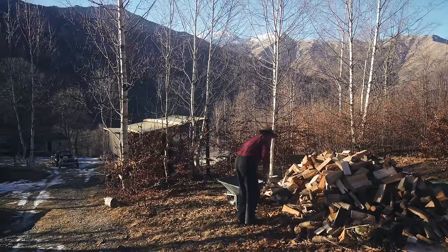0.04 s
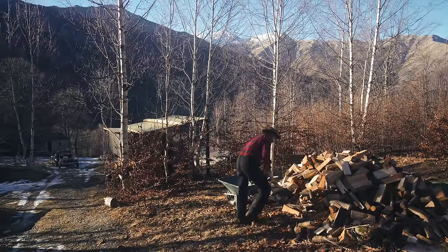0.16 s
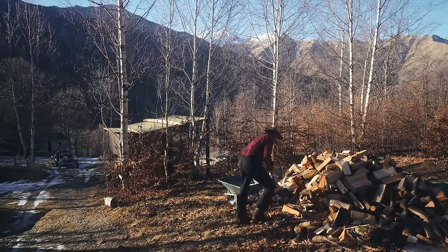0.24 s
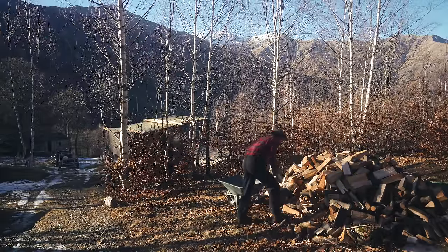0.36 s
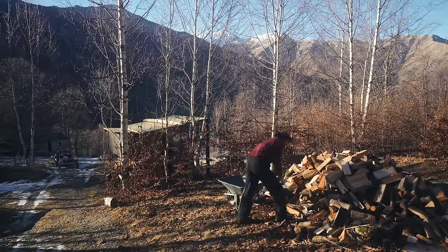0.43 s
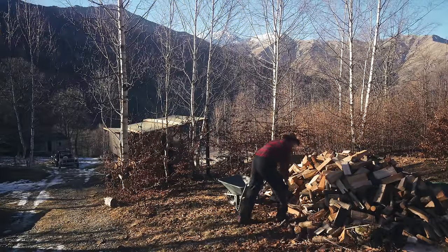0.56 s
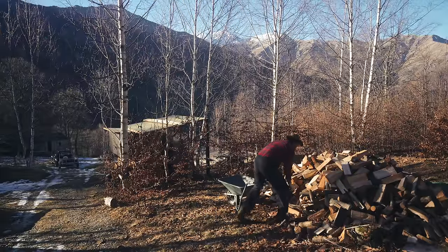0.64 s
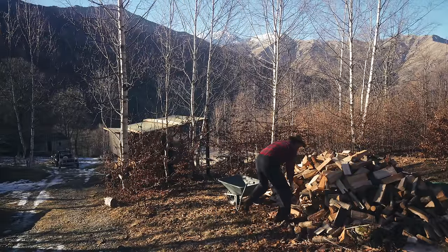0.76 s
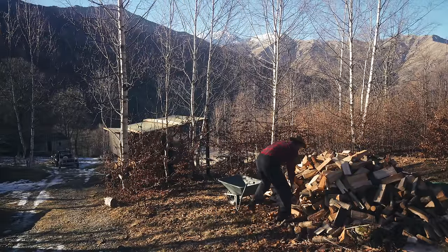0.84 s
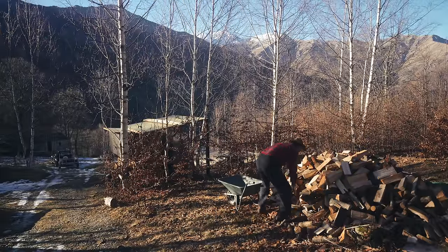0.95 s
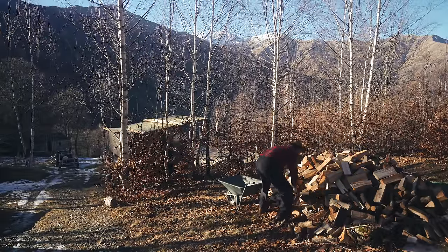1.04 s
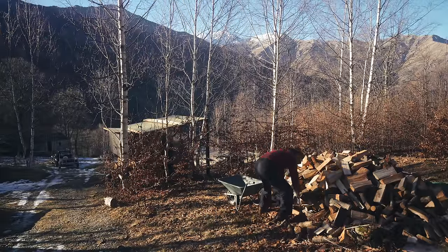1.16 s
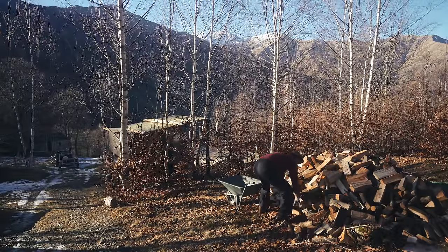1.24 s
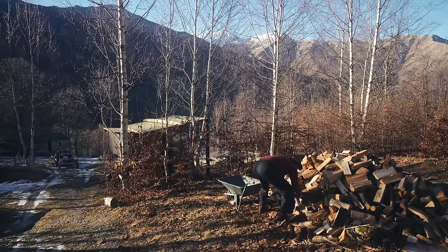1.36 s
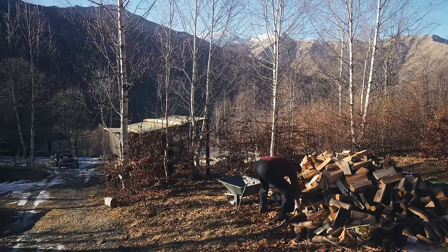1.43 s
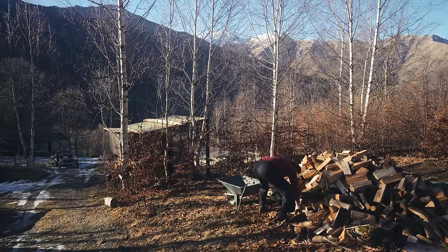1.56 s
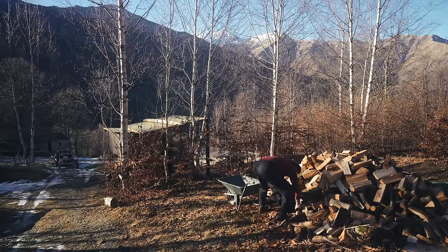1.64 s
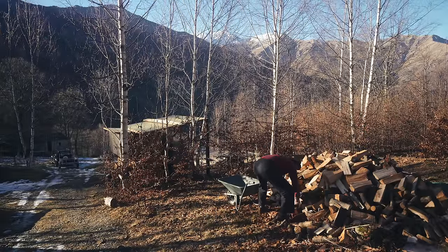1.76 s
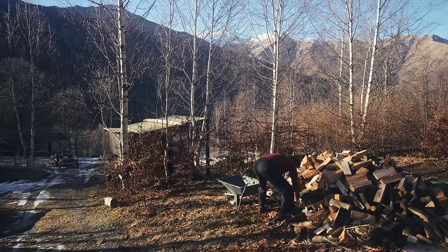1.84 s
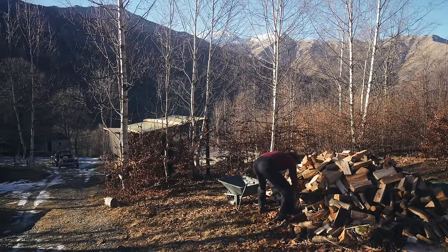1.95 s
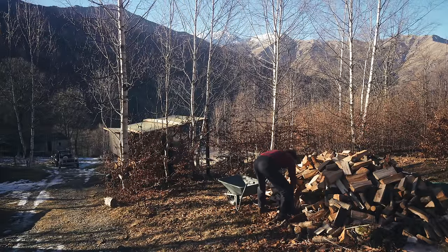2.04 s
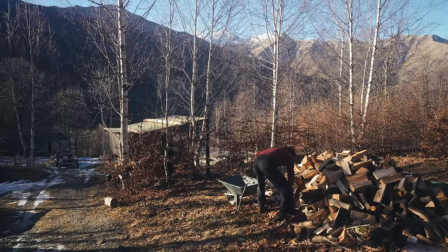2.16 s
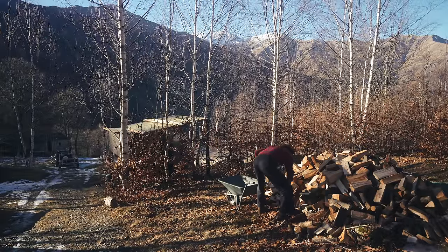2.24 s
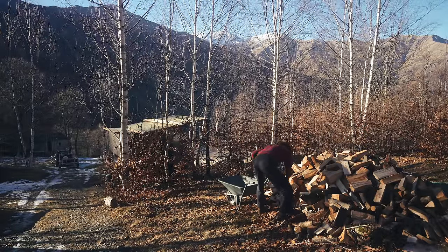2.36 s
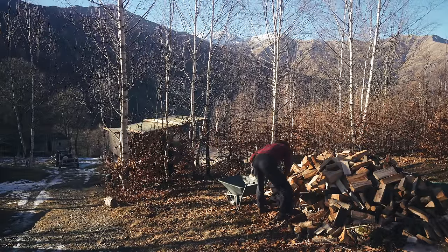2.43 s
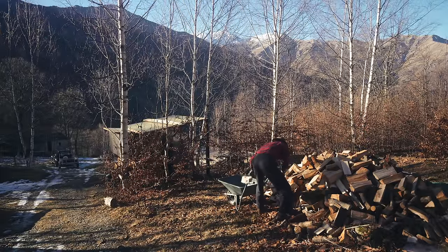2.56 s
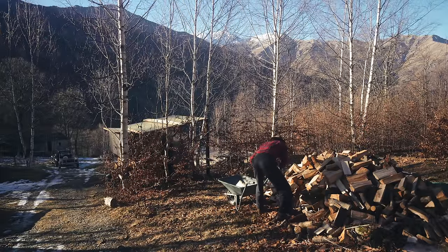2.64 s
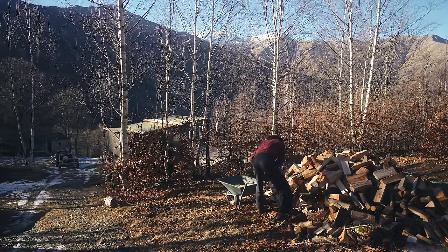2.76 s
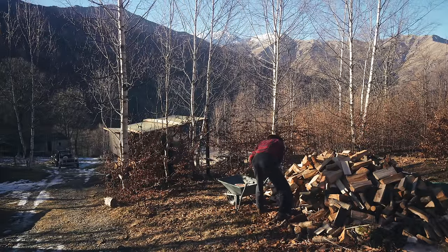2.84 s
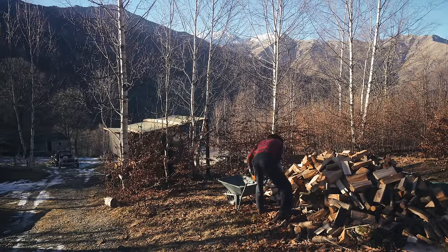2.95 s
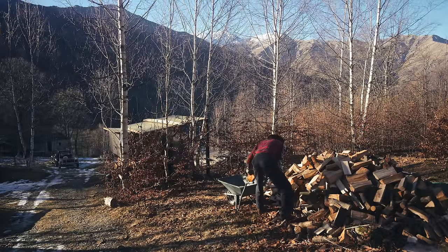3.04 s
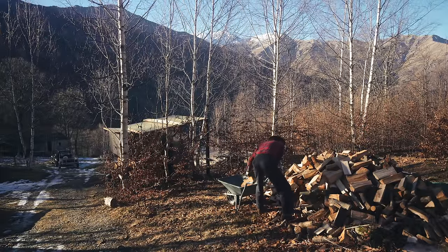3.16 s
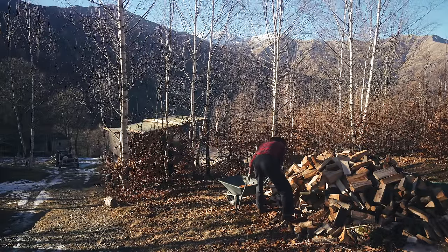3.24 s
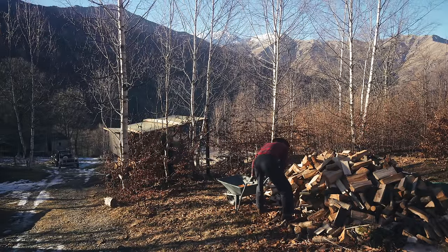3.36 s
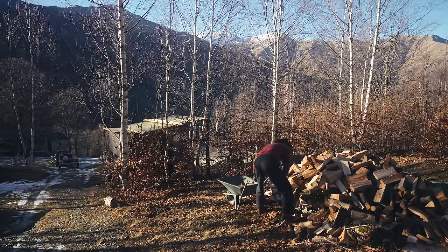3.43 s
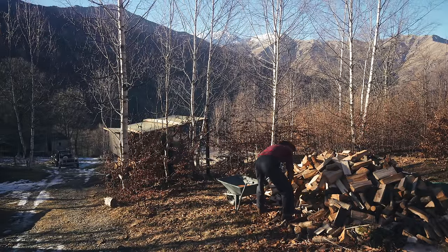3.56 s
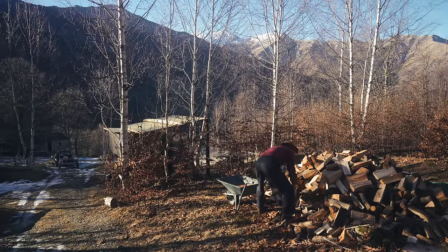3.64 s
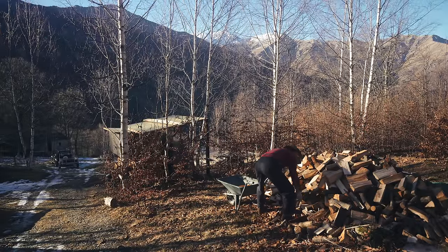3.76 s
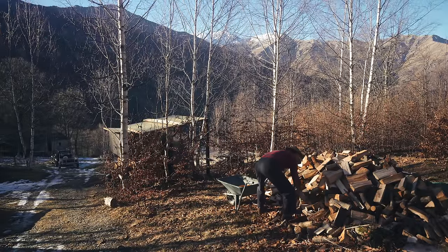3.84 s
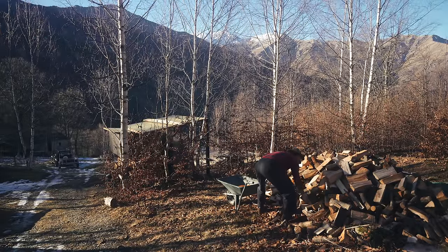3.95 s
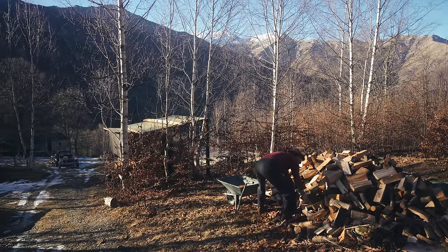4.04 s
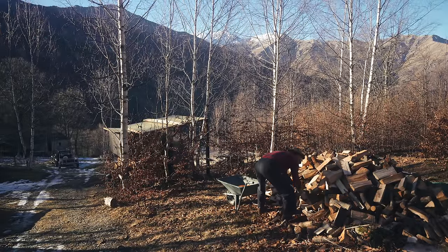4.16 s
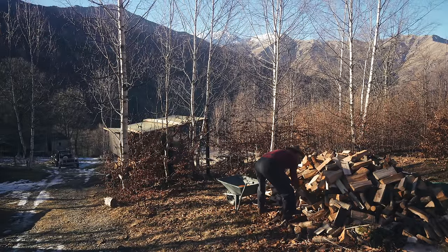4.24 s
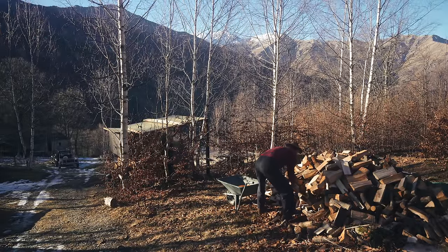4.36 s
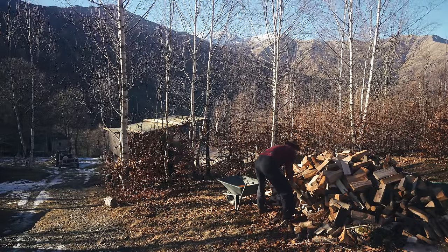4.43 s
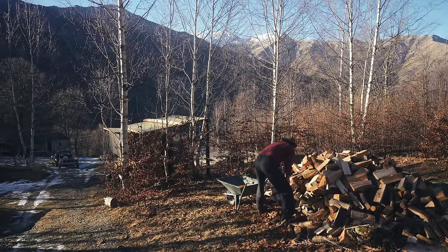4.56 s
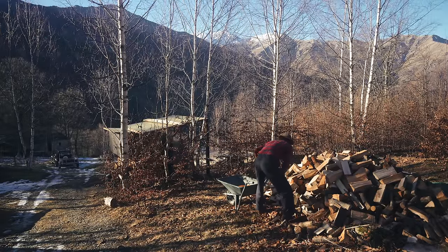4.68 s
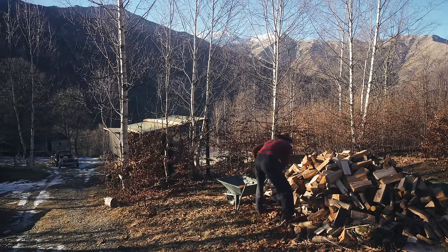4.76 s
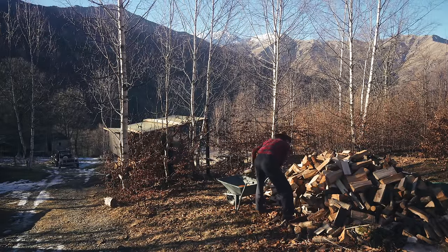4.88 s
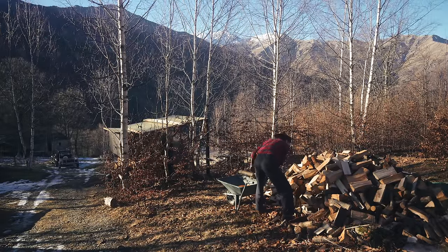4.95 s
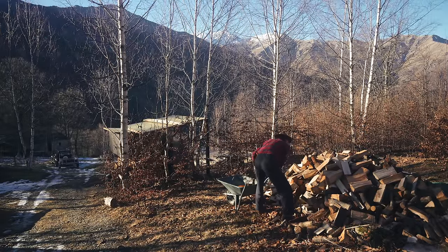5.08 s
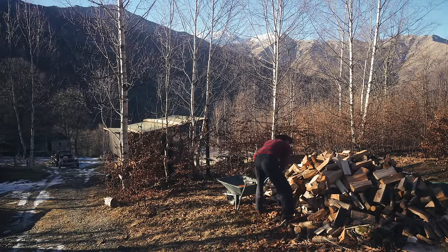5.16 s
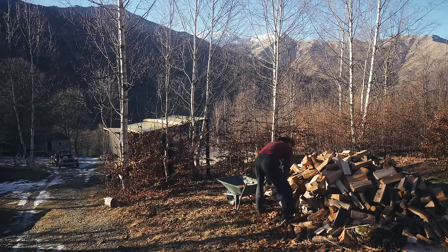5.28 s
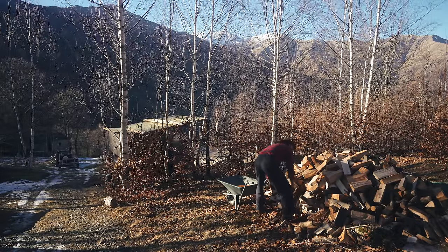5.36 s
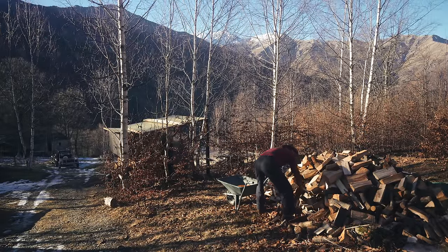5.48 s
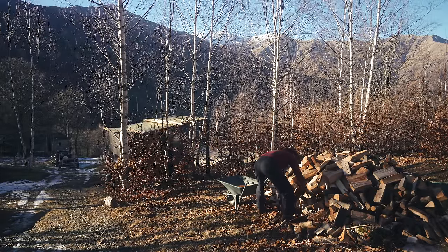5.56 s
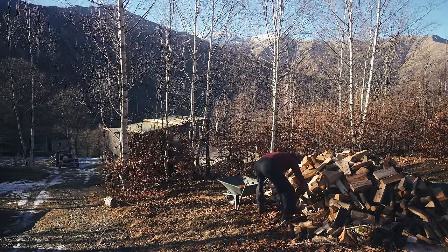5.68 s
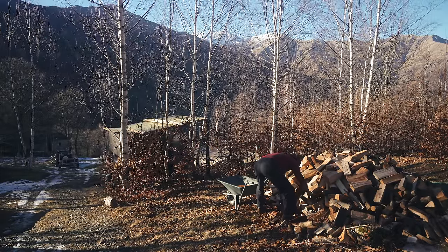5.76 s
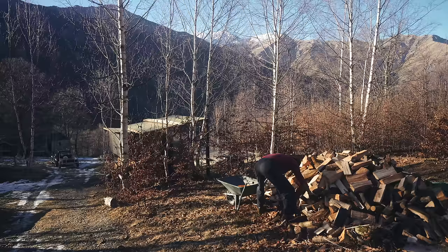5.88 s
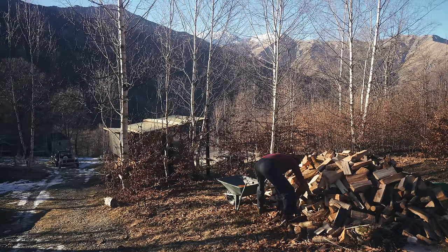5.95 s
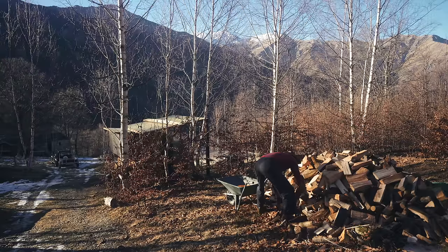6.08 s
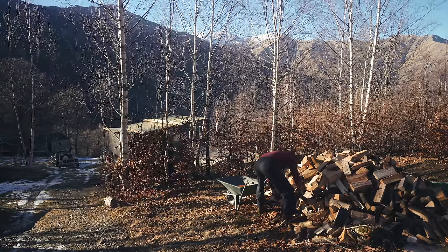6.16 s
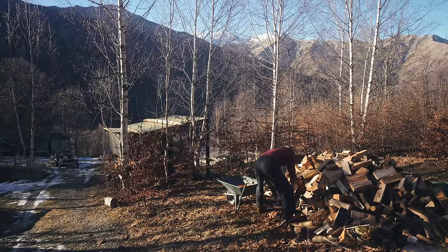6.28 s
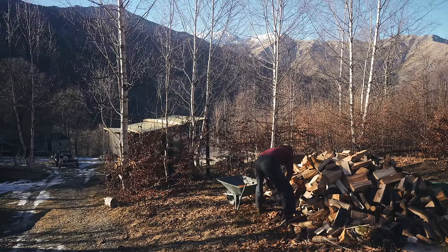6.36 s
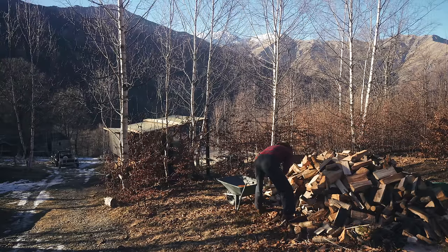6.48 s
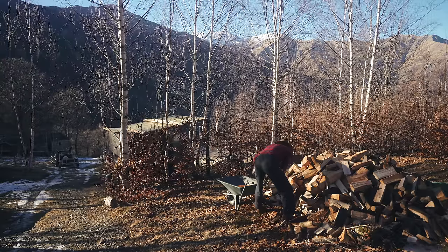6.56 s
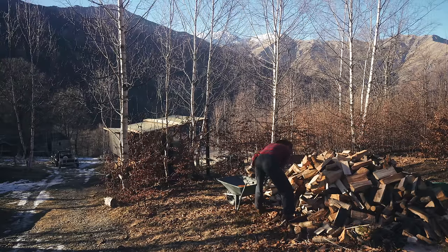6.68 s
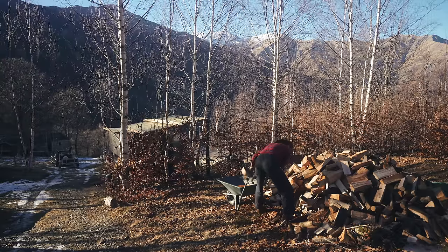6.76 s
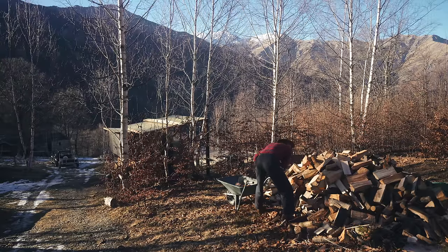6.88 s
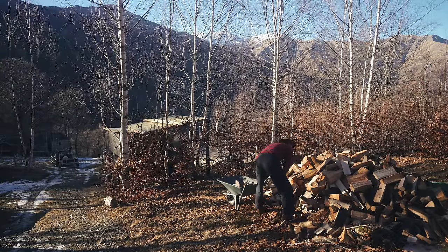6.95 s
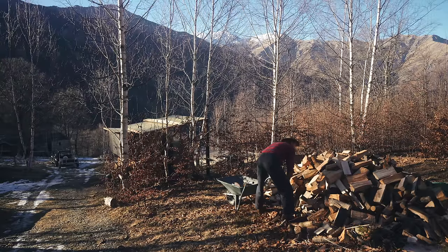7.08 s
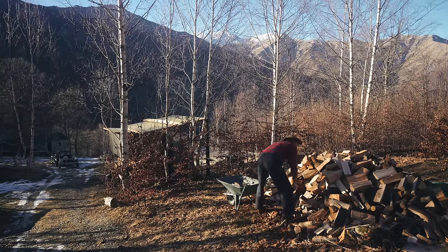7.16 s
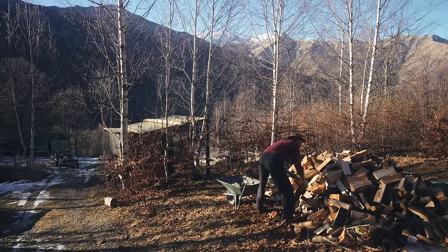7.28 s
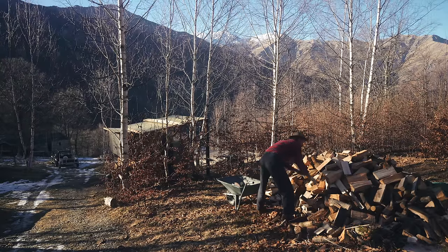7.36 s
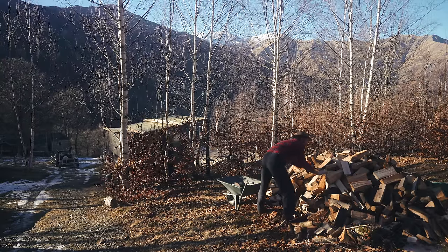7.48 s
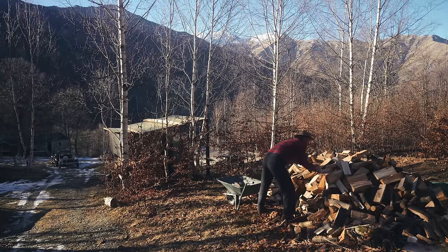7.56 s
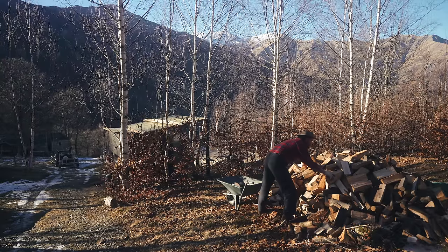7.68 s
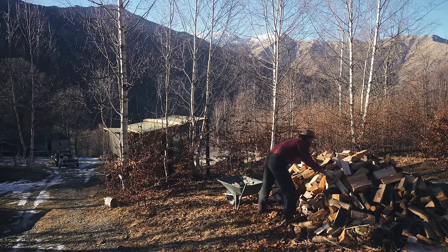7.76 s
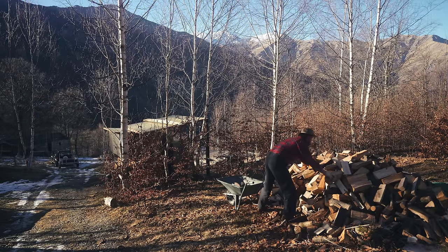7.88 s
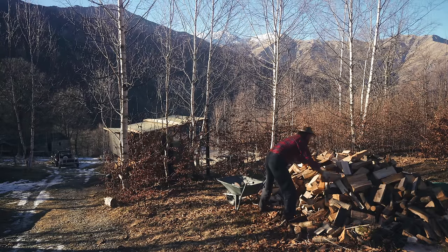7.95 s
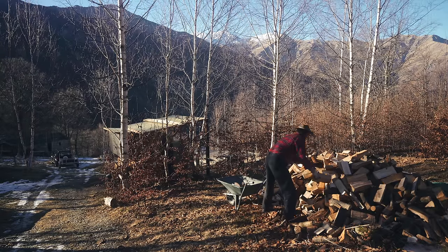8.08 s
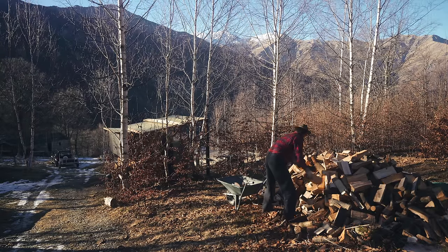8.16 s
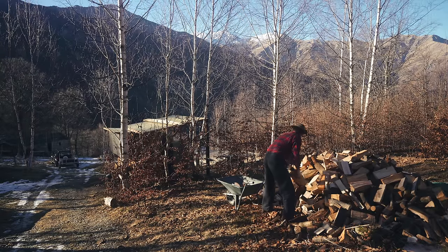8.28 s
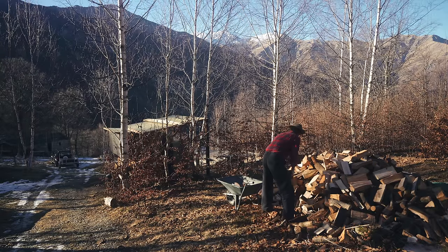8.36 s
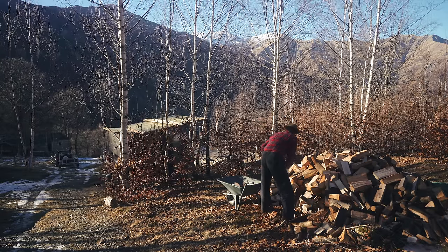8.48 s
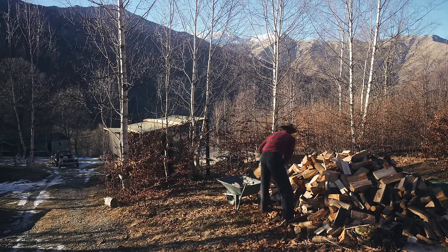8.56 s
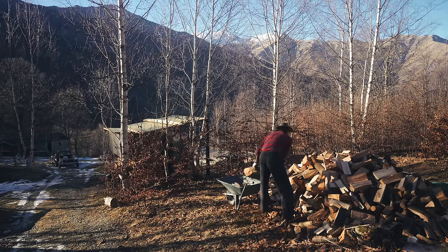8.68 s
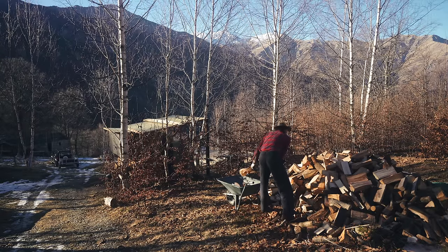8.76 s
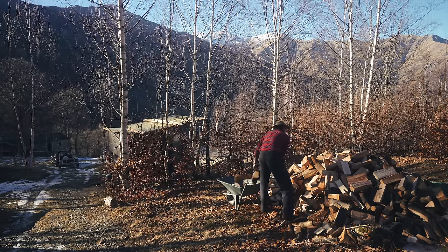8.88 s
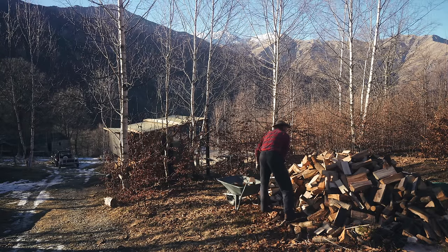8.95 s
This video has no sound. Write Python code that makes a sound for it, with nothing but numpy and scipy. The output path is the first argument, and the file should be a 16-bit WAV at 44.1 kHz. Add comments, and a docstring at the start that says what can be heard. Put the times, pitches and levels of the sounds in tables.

```python
"""Split logs clack, crack and boom into a steel wheelbarrow on a leafy slope, some metres away.
Each knock is two brief wood modes plus a crack of filtered noise; its shake sets the tray boom and clatter.
Noise grains make the rustle of leaves and tumbling wood; wavering tones squeak, noise bursts tick sharply.
Decaying sines make one dry log ring; coloured noise is the faint hum of the valley.
The ground and the trees send the wood sounds back."""
import sys
import numpy as np
from scipy import signal
from scipy.fft import rfft, irfft
from scipy.io import wavfile
from scipy.ndimage import uniform_filter1d

SR = 44100
rng = np.random.default_rng(int(sys.argv[2]) if len(sys.argv) > 2 else 0)


def inscribe(sig):
    """Save sig as 16-bit PCM at rate SR to the path in sys.argv[1].

    A 1-D sig is mono; a 2-D sig holds one channel per row.
    Samples are clipped to [-1, 1] before scaling.
    """
    pcm = np.round(np.clip(np.atleast_2d(sig).T, -1, 1) * 32767)
    wavfile.write(sys.argv[1], SR, pcm.astype(np.int16))


N = 397341

# Far hum and air. Each row: frequency in Hz, relative spectrum in dB.
VALLEY_SPECTRUM = [(18, -49), (30, 18.5), (141, -9), (273, 0), (1220, -4), (2170, -16), (3980, -22),
                   (14800, -40.5), (16000, -31.5)]
# Colour of leaf rustle. Each row: frequency in Hz, relative spectrum in dB.
LEAF_SPECTRUM = [(59, -19), (100, -22.5), (302, -5), (343, -4.5), (481, 0), (3250, -0.5), (7940, -10),
                 (10000, -23.5), (13500, -20.5), (16000, -35)]
# Colour of loose wood. Each row: frequency in Hz, relative spectrum in dB.
PILE_SPECTRUM = [(24, -53), (60, -7.5), (163, -3), (330, -7.5), (570, -6), (1070, -11.5), (2000, -16),
                 (3500, -19), (5600, -43), (16000, -63.5)]
# Boots and hands stir leaves, bark and loose wood. Each row: peak time in seconds, leaf level in dB,
# wood level in dB, rise in seconds per 20 dB, fall in seconds per 20 dB.
STIRS = [(0.029, -57.5, -40, 0.52, 0.1), (.195, -36, -43.5, 0.079, 0.075), (0.441, -22.5, -45, 0.014, 0.07),
         (0.577, -32, -55, 0.14, 0.087), (0.718, -46, -54, 0.39, 0.26), (1.115, -36, -43.5, 0.11, 0.092),
         (1.451, -49.5, -74, 0.16, 1), (1.734, -46, -54, 0.54, 0.17), (2.1, -51.5, -74, 1, 0.49),
         (2.588, -53.5, -62, 0.19, 0.11), (3.149, -35.5, -44, 0.19, 0.08), (3.462, -53, -46, 0.024, .06),
         (3.787, -60, -48, 0.47, .3), (3.931, -64, -51.5, 0.24, 0.36), (4.143, -51, -57, 0.077, 0.17),
         (4.35, -47.5, -48.5, 0.59, 0.2), (4.51, -55, -62, .03, 0.21), (4.737, -49, -59, 0.15, 0.12),
         (4.955, -57, -72, 0.34, 0.24), (5.047, -59.5, -63, .03, .1), (5.653, -48, -62, 0.7, 0.18),
         (5.879, -52, -54.5, 0.31, 0.43), (6.128, -45, -69, 0.38, 0.18), (6.683, -59, -71, 0.11, 0.26),
         (6.918, -38.5, -51.5, 0.0096, 0.072), (7.709, -57, -59.5, 0.022, 0.37),
         (7.95, -43, -48, 0.015, 0.068), (8.03, -48.5, -55.5, 0.37, 0.27),
         (8.63, -57.5, -64.5, 0.092, 0.11), (8.79, -46, -52.5, 0.065, 0.26), (8.929, -41, -71, 0.072, .5)]
# Log blows. Each row: time in seconds, low mode level in dB, low mode in Hz, high mode level in dB,
# high mode in Hz, crack level in dB before GRIT_DB, shake of the load in dB.
KNOCKS = [(0.0972, -24.5, 316, -31, 1520.0, -64, -40), (0.4267, -22.5, 1020, -25, 1360, -17, -37),
          (0.4352, -22, 447, -15.5, 2500.0, -23, -26.5), (0.4499, -26, 473, -9.5, 3670.0, -16, -40),
          (0.4635, -25, 1000, -17, 2600, -24, -44), (0.484, -18, 1500, -22, 2500, -24, -46),
          (0.511, -21, 1000, -40, 2000, -45, -50), (0.5265, -24, 332, -16, 3660.0, -13, -34),
          (0.531, -22.5, 600, -20, 2300, -30, -50), (0.622, -18.5, 1900, -14.5, 3990.0, -14.5, -54),
          (1.017, -38, 356, -43.5, 1500, -32, -36), (1.0398, -36.5, 510.0, -44, 1570.0, -29, -38),
          (1.066, -29, 557, -23.5, 2360.0, -23.5, -31.5), (1.0873, -42.5, 795, -21.5, 4470.0, -12.5, -59),
          (1.1058, -39.5, 900.0, -9.5, 3800.0, -15.5, -50.5),
          (1.1205, -47, 900.0, -18.5, 3560, -7.5, -51.5), (2.287, -58, 960, -43, 1750.0, -28.5, -65.0),
          (2.627, -34, 745, -29, 2200.0, -36.5, -59.5), (2.7429, -11.5, 365, -5, 1200, -11.5, -7),
          (2.7495, -20, 480, -14, 950, -34, -11), (2.7575, -11, 700, -11.5, 1370, -30, -15.5),
          (2.7745, -9.5, 500, -10.5, 1300, -17, -7), (2.7778, -11, 200, -9.5, 1700, -13, -10.5),
          (2.7855, -11.5, 300, -9.5, 1200, -24, -13), (2.81, -12, 197, -19.5, 1360.0, -17, -21),
          (2.8436, -27, 565, -28, 1200.0, -36, -17), (2.8737, -28, 526, -30, 1250.0, -41, -26),
          (2.98, -20.5, 333, -19, 1240.0, -51, -29), (2.9949, -5.5, 452, -11.5, 1100.0, -46.5, -11.5),
          (3.0125, -12.5, 490, -15.5, 1820, -16.5, -13.5), (3.034, -24.5, 557, -23, 1800, -34, -19.5),
          (3.1372, -50, 596, -24, 4420.0, -9, -28.5), (3.199, -28, 810, -24, 1510, -19.5, -36),
          (3.244, -42, 900, -27.5, 1590, -45, -35), (3.257, -26, 470, -22, 1170.0, -37.5, -21),
          (3.2767, -7, 340, -13, 1100.0, -41, -8), (3.3003, -9, 500, -24, 1100, -27, -11.5),
          (3.3117, -11.5, 530, -21, 1230.0, -28.5, -23), (3.3222, -7, 1600, -8.5, 2950, -13, -11),
          (3.3255, -8.5, 630, -7.5, 2900, -4.5, -10), (3.3355, -11.5, 260, -18, 1500, -20, -20),
          (3.3469, -14, 420, -9.5, 1100.0, -24, -28.5), (3.3653, -13, 590, -18, 1180.0, -31.5, -13),
          (3.4114, -15.5, 460.0, -22, 1140.0, -45.5, -39), (3.4253, -17, 550, -19, 1610.0, -42, -22.5),
          (3.4548, -11, 1900, -10, 3250, -14.5, -26.5), (3.554, -27.5, 520, -44, 1520.0, -55.0, -53),
          (3.6108, -27.5, 530, -28, 1100.0, -58, -40.5), (4.0381, -43, 604, -33, 2720.0, -23, -39.5),
          (4.1378, -18.5, 1230, -14.5, 2240, -32, -38.5), (4.226, -43, 900.0, -32.5, 2000.0, -25, -36.5),
          (4.3197, -36, 374, -32, 1260.0, -33, -38), (4.4718, -26, 515, -30, 1110.0, -59.5, -35),
          (4.5028, -29, 835, -13.5, 2360.0, -8, -51), (4.546, -32.5, 505, -42, 1090, -55, -39),
          (4.5662, -25.5, 307, -37, 1570.0, -57, -43), (4.5868, -26.5, 553, -33.5, 1370.0, -28, -39),
          (4.6363, -39, 580.0, -34.5, 1580, -55, -35.5), (4.7325, -7, 472, -23.5, 1100.0, -31.5, -28),
          (5.0393, -18, 876, -15, 1350.0, -56, -37), (5.1332, -16.5, 400.0, -20, 1690.0, -40, -16),
          (5.1929, -15.5, 510, -23.5, 2140.0, -46.5, -18), (5.2262, -5.5, 302, -6.5, 1100.0, -25, -8.5),
          (5.2382, -2, 490, -6, 1100.0, -25.5, -15), (5.2525, -9.5, 554, -31, 1110.0, -30, -17.5),
          (5.2637, -6, 910, -10, 2300, -15.5, -20), (5.2668, -1.5, 1010, -14, 2000, -25, -14.5),
          (5.2865, -11, 795, -20, 1470.0, -41, -36), (5.3113, -21, 411, -29.5, 1550, -39, -23.5),
          (5.3404, -14.5, 350, -18, 1180.0, -55.5, -22), (5.3807, -36, 520, -27.5, 1200, -43.5, -21.5),
          (5.4335, -3, 502, -13.5, 1350.0, -27.5, -12), (5.4391, -3, 430, -5.5, 1360.0, -13.5, -16.5),
          (5.4751, -15.5, 510, -34, 1100.0, -30, -48.5), (5.574, -29, 480, -46, 2400, -50, -27),
          (5.5805, -12, 540, -24, 1000, -48, -27.5), (5.681, -32.5, 575, -40, 2890.0, -44, -47),
          (6.911, -36, 1080, -28.5, 2420.0, -12, -40.5), (6.9367, -6, 560, -16, 1100.0, -29, -16),
          (6.9586, -9.5, 685, -15, 1380.0, -37, -20), (6.9672, -26.5, 760.0, -15.5, 1360.0, -35.5, -15),
          (7.0044, -17.5, 590, -16, 1440.0, -33, -18.5), (7.013, -29, 690, -16.5, 2950.0, -41, -38),
          (7.0484, -3, 635, -5, 1100.0, -41, -23.5), (7.0653, -16, 490, -16.5, 1400.0, -53, -45),
          (7.0897, -19.5, 670.0, -16.5, 1510.0, -50, -27.5), (7.1186, -21, 260.0, -31, 1490.0, -48.5, -32),
          (7.1376, -12.5, 360, -18.5, 1100.0, -49.5, -28), (7.17, -27, 520, -28.5, 1490, -49, -32.5),
          (7.2079, -4.5, 773, -27, 1440.0, -51, -35), (7.249, -21.5, 700, -32, 1200, -60, -46),
          (7.557, -52.5, 350.0, -35.5, 1673, -35, -49), (7.8378, -41.5, 333, -47, 1100.0, -56, -44),
          (7.878, -39, 905, -39.5, 1490, -50, -51), (7.9407, -35, 636, -34.5, 1980.0, -48, -46.5),
          (8.0361, -24.5, 456, -28.5, 1380.0, -24, -39), (8.152, -56, 590, -42, 3130, -29, -59.5),
          (8.333, -31, 510, -60, 1310.0, -61, -50), (8.357, -39, 550, -60, 1300, -60, -47.5),
          (8.7881, -17.5, 1650, -12, 3630.0, -20, -63), (8.8225, -32, 610, -23.5, 1800, -30, -55),
          (9.0046, -2, 666, -4, 1100.0, -19, -33.0)]
# Modes of the steel tray. Each row: frequency in Hz, relative level in dB, decay by 60 dB in seconds.
TRAY_MODES = [(157, -4, 0.14), (213, -3.5, 0.18), (118, -8, 0.18), (494, -9, 0.33), (660, -3, 0.13)]
# Reflections off the ground. Each row: delay in seconds, gain in dB.
GROUND_ECHOES = [(.0045, -22)]
# Wood sliding on wood. Each row: start in seconds, length in seconds, mean frequency in Hz, level in dB.
SQUEAKS = [(1.108, 0.0076, 3215, -14), (1.372, 0.08, 1413, -52), (4.245, 0.022, 4200, -50),
           (4.331, 0.085, 1700, -40), (4.423, 0.031, 2500, -49), (5.737, 0.076, 1567, -51),
           (5.858, 0.036, 1557, -47), (5.955, .1, 1590, -52), (8.739, 0.036, 1360, -47.5)]
# Small sharp ticks: snapping twigs and light knocks of wood. Each row: time in seconds, peak level in dB,
# centre frequency in Hz.
SHARP_TICKS = [(2.7229, -32.5, 2250), (3.969, -41, 3500), (3.991, -41, 4000), (4.105, -37.5, 3000),
               (4.776, -42, 4200), (4.785, -36, 3000), (4.817, -37, 2500), (4.874, -49, 5500),
               (5.065, -40, 3800), (5.149, -33.5, 3500), (5.315, -39.5, 8000), (5.795, -34.5, 2500),
               (5.868, -43, 2500), (5.942, -43, 2500), (6.018, -35, 3000), (6.095, -44, 3000),
               (6.225, -39.5, 3000), (8.9172, -28, 2700)]
# Modes of a dry log. Each row: frequency in Hz, relative level in dB, decay by 60 dB in seconds.
SINGER_MODES = [(1534, 0, 0.2), (1527, -19, 0.95), (1445, 9, 0.03), (1682, -22, 0.35)]
# Blows on that log. Each row: time in seconds, gain in dB.
SINGER_BLOWS = [(7.053, -33), (7.089, -33), (7.2073, -17), (7.2391, -23)]

VALLEY_DB = -58
CALM_LEAVES_DB, CALM_WOOD_DB = -68, -62  # floors: leaves and wood are never quite still
# a shaken load sheds bark and rolls on: level against the shake
SHED_DB, SHED_T60_S, SHED_RISE_S = -26.5, 0.31, 0.0021
ROLL_DB, ROLL_T60_S, ROLL_RISE_S = -20, 0.7, 0.05
LOW_PEAK_CYCLES, HIGH_PEAK_CYCLES = 0.96, 1.31  # cycles until a mode is at its strongest
RING_DB, RING_RISE_CYCLES, RING_T60_CYCLES = -16, 8.3, 8.7  # soft ring-on of each mode, before its rise
CRACK_PEAK_S, GRIT_DB = 0.00079, -7.5
KNOCK_LEAD_S = 0.0009
PILE_DB, PILE_T60_S, PILE_RISE_S = -5.5, 0.047, 0.00087
TRAY_DB, TRAY_RISE_S = -10, 0.0022  # boom against the shake
CLATTER_DB = -5.5  # against the shake
CLATTER_T60_S, CLATTER_RISE_S = 0.23, 0.00039
CLATTER_TREBLE_T60_S, CLATTER_TREBLE_RISE_S = 0.091, 0.0005
CLACKS_PER_S_AT_500_HZ, CLACK_T60_CYCLES = 70, 12
TREES_DB, TREES_T60_S, TREES_RISE_S = -19.5, 0.27, 0.017
TICK_PEAK_S, TICK_BAND_RATIO = 0.00069, 1.3
TOP_HZ, BASS_CUT_HZ, CEILING = 16000, 70, 0.85


def undb(db):
    """Amplitude ratio of a level in dB."""
    return 10 ** (np.asarray(db) / 20)


def level(x, rms_db):
    """Scale x to the given RMS level."""
    return x * undb(rms_db) / np.sqrt(np.mean(x ** 2))


def add(out, start_s, x):
    """Mix x into out from start_s."""
    i = int(start_s * SR)
    out[i:i + len(x)] += x[:len(out) - i]


def fade(t, t60):
    """Exponential decay, 60 dB down at t60; t and t60 share a unit."""
    return np.exp(-np.log(1000) * t / t60)


def onset(t_s, rise_s):
    """Exponential approach from 0 to 1."""
    return 1 - np.exp(-t_s / rise_s)


def swell(t_s, peak_s):
    """Rises smoothly to 1 at peak_s and dies away: a contact that builds and lets go."""
    return (t_s / peak_s * np.exp(1 - t_s / peak_s)) ** 2


def modes(table, t_s):
    """One decaying sine per row of a mode table."""
    hz, db, t60_s = np.transpose(table)[:, :, None]
    return undb(db) * np.sin(2 * np.pi * hz * t_s) * fade(t_s, t60_s)


def colour(x, spectrum):
    """Causal minimum-phase filter with the given spectrum, from the folded cepstrum."""
    hz, db = np.transpose(spectrum)
    size = 4096
    grid_hz = np.maximum(np.arange(size // 2 + 1) * SR / size, 1)
    gain = undb(np.interp(np.log(grid_hz), np.log(hz), db))
    cepstrum = irfft(np.log(gain))
    cepstrum[1:size // 2] *= 2
    cepstrum[size // 2 + 1:] = 0
    impulse = irfft(np.exp(rfft(cepstrum)))
    return signal.fftconvolve(x, impulse)[:len(x)]


def grains(rate_per_s, spread_db, tail_s):
    """Random clicks of uneven size, each smeared into a short noisy tail."""
    hit = rng.random(N) < rate_per_s / SR
    size = hit * undb(spread_db * np.minimum(rng.exponential(size=N), 4))
    tail = np.exp(-np.arange(int(8 * tail_s * SR)) / (tail_s * SR))
    return signal.fftconvolve(size, tail)[:N] * rng.standard_normal(N)


def stirred(peaks_db, calm_db):
    """Power of all stirs: each swells to its peak and dies away, over a steady calm."""
    t_s = np.arange(0, N / SR + .01, .002)
    peak_s, _, _, rise_s, fall_s = np.transpose(STIRS)[:, :, None]
    below_db = 20 * np.where(t_s < peak_s, (peak_s - t_s) / rise_s, (t_s - peak_s) / fall_s)
    # doubled dB turn amplitude into power
    power = undb(2 * (peaks_db[:, None] - below_db)).sum(axis=0) + undb(2 * calm_db)
    return np.interp(np.arange(N) / SR, t_s, power)


def shaken(db, t60_s, rise_s):
    """Power of what lingers for up to half a second after each blow, scaled by its shake."""
    out, t_s = np.zeros(N), np.arange(SR // 2) / SR
    linger = fade(t_s, t60_s / 2) * onset(t_s, rise_s)
    for knock in KNOCKS:
        time_s, shake_db = knock[0], knock[-1]
        add(out, time_s, undb(2 * (shake_db + db)) * linger)
    return out


def valley():
    """Steady far hum and air: coloured noise."""
    return level(colour(rng.standard_normal(N), VALLEY_SPECTRUM), VALLEY_DB)


def rustle():
    """Stirred leaves and shed bark: crisp crackle and a few twig ticks over a soft swish."""
    crackle = level(grains(500, 3.5, .0008), -2)
    twigs = level(grains(40, 3.0, .0012), -10)
    swish = level(rng.standard_normal(N), -1.4)
    leaves = level(colour(crackle + twigs + swish, LEAF_SPECTRUM), 0)
    leaf_peaks_db = np.transpose(STIRS)[1]
    power = stirred(leaf_peaks_db, CALM_LEAVES_DB) + shaken(SHED_DB, SHED_T60_S, SHED_RISE_S)
    return np.sqrt(power) * leaves


def tumble():
    """Stirred and rolling wood: dense soft bumps with the colour of the pile, its treble dulled."""
    bumps = colour(grains(800, 1.8, .004), PILE_SPECTRUM)
    dulled = signal.sosfilt(signal.butter(2, 1100, fs=SR, output="sos"), bumps)
    wood_peaks_db = np.transpose(STIRS)[2]
    power = stirred(wood_peaks_db, CALM_WOOD_DB) + shaken(ROLL_DB, ROLL_T60_S, ROLL_RISE_S)
    return np.sqrt(power) * level(dulled, 0)


def wood_mode(hz, peak_cycles, partial_ratio, partial_gain, t_s):
    """Damped wood: a mode swells and dies within a few cycles, then rings on softly."""
    # a second partial keeps the mode from sounding like a pure tone
    tone = np.sin(2 * np.pi * hz * t_s) + partial_gain * np.sin(2 * np.pi * partial_ratio * hz * t_s)
    cycles = hz * t_s
    ring = undb(RING_DB) * fade(cycles, RING_T60_CYCLES) * (1 - fade(cycles, RING_RISE_CYCLES))
    return tone * (swell(t_s, peak_cycles / hz) + ring)


def knocks():
    """Each blow excites two wood modes and a crack of bark; neighbouring logs scatter it."""
    out, t_s = np.zeros(N), np.arange(int(0.039 * SR)) / SR
    grit_band = signal.butter(2, [2300, 7000], "band", fs=SR, output="sos")
    for time_s, low_db, low_hz, high_db, high_hz, crack_db, _ in KNOCKS:
        low = undb(low_db) * wood_mode(low_hz, LOW_PEAK_CYCLES, 1.46, 0.43, t_s)
        high = undb(high_db) * wood_mode(high_hz, HIGH_PEAK_CYCLES, 1.227, 0.13, t_s)
        grit = signal.sosfilt(grit_band, rng.standard_normal(len(t_s)))
        crack = undb(crack_db + GRIT_DB) * grit * swell(t_s, CRACK_PEAK_S)
        blow = crack - low - high
        # a new scatter wherever the log lands
        scatter = rng.standard_normal(len(t_s)) * fade(t_s, PILE_T60_S) * onset(t_s, PILE_RISE_S)
        scatter *= undb(PILE_DB) / np.linalg.norm(scatter)
        add(out, time_s - KNOCK_LEAD_S, blow)
        add(out, time_s - KNOCK_LEAD_S, np.convolve(blow, scatter))
    return out


def tray_booms():
    """Each blow rings the steel tray's modes in proportion to its shake."""
    out, t_s = np.zeros(N), np.arange(int(.4 * SR)) / SR
    tray = modes(TRAY_MODES, t_s) * onset(t_s, TRAY_RISE_S)
    for knock in KNOCKS:
        time_s, shake_db = knock[0], knock[-1]
        # every blow lands elsewhere: sign and weight of each mode change
        draw = rng.standard_normal(len(TRAY_MODES))
        weights = np.sign(draw) * undb(2.4 * draw)
        add(out, time_s, undb(shake_db + TRAY_DB) * weights @ tray)
    return out


def clacking():
    """Many small knocks of loose wood, each ringing briefly at one of a ladder of pitches."""
    out = np.zeros(N)
    for hz in 120 * 2 ** np.arange(0, 6, 1 / 3):
        rate_per_s = CLACKS_PER_S_AT_500_HZ * np.sqrt(hz / 500)
        hits = (rng.random(N) < rate_per_s / SR) * rng.standard_normal(N)
        # two-pole resonator; keep is its decay per sample
        keep = fade(hz / SR, CLACK_T60_CYCLES)
        ring = signal.lfilter([1], [1, -2 * keep * np.cos(2 * np.pi * hz / SR), keep ** 2], hits)
        out += np.sqrt(hz) * level(ring, 0)
    return out


def clatter():
    """The shaken load clatters on after each blow; its treble dies first."""
    loose = level(grains(1200, 1.6, .002), -5) + level(clacking(), -2)
    loose = level(colour(loose, PILE_SPECTRUM), 0)
    dull = signal.sosfiltfilt(signal.butter(1, 1500, fs=SR, output="sos"), loose)
    treble = loose - dull
    # shakes add in power
    dull_power = shaken(CLATTER_DB, CLATTER_T60_S, CLATTER_RISE_S)
    treble_power = shaken(CLATTER_DB, CLATTER_TREBLE_T60_S, CLATTER_TREBLE_RISE_S)
    return np.sqrt(dull_power) * dull + np.sqrt(treble_power) * treble


def ground(wood):
    """The ground reflects delayed, weaker copies."""
    out = np.zeros(N)
    for delay_s, db in GROUND_ECHOES:
        add(out, delay_s, undb(db) * wood)
    return out


def trees(wood):
    """Trunks and shed send back a faint, late wash: convolution with decaying noise."""
    t_s = np.arange(SR // 2) / SR
    wash = rng.standard_normal(len(t_s)) * fade(t_s, TREES_T60_S) * onset(t_s, TREES_RISE_S)
    return signal.fftconvolve(wood, undb(TREES_DB) * wash / np.linalg.norm(wash))[:N]


def squeaks():
    """Stick-slip locked to a mode: a tone of wavering pitch and uneven level."""
    out = np.zeros(N)
    for start_s, length_s, hz, db in SQUEAKS:
        count = int(length_s * SR)
        waver = uniform_filter1d(rng.standard_normal((2, 8000)), size=70)[:, :count]
        phase = 2 * np.pi * np.cumsum(hz * (1 + .4 * waver[0])) / SR
        tone = np.sin(phase) + 0.2 * np.sin(2 * phase)
        uneven = undb(db + 34 * waver[1])
        add(out, start_s, uneven * np.sqrt(np.hanning(count)) * tone)
    return out


def sharp_ticks():
    """Snapping twigs and light knocks of wood: short noise bursts, each in a band around its pitch."""
    out, t_s = np.zeros(N), np.arange(SR // 50) / SR
    for time_s, peak_db, hz in SHARP_TICKS:
        noise = rng.standard_normal(len(t_s)) * swell(t_s, TICK_PEAK_S)
        edges_hz = [hz / TICK_BAND_RATIO, hz * TICK_BAND_RATIO]
        burst = signal.sosfilt(signal.butter(1, edges_hz, "band", fs=SR, output="sos"), noise)
        add(out, time_s - TICK_PEAK_S, undb(peak_db) * burst / np.abs(burst).max())
    return out


def singing_log():
    """A dry log rings at the same modes at every blow; it rocks on its neighbours, so the ring wavers."""
    out, t_s = np.zeros(N), np.arange(SR) / SR
    ring = modes(SINGER_MODES, t_s).sum(axis=0) * onset(t_s, .001)
    for time_s, db in SINGER_BLOWS:
        add(out, time_s, undb(db) * ring)
    rocking = signal.fftconvolve(rng.standard_normal(N), np.hanning(600), "same")
    rocking_db = level(rocking, 4)  # RMS swing of undb(4), about 1.6 dB
    return out * level(undb(rocking_db), 0)


def scene():
    """Wood sounds with their reflections, over tumble, rustle and the valley; one channel."""
    wood = knocks() + tray_booms() + clatter() + squeaks() + sharp_ticks() + singing_log()
    out = wood + ground(wood) + trees(wood)
    out += valley() + rustle() + tumble()
    return out[None]


def record(dry):
    """The microphone chain thins the deep bass, rounds off the loudest peaks and cuts the top."""
    thin = signal.sosfilt(signal.butter(2, BASS_CUT_HZ, "high", fs=SR, output="sos"), dry)
    held = thin / (1 + np.abs(thin / CEILING) ** 6) ** (1 / 6)
    return signal.sosfilt(signal.ellip(10, .2, 80, TOP_HZ, fs=SR, output="sos"), held)


dry = scene()
out = record(dry)
inscribe(out)
```